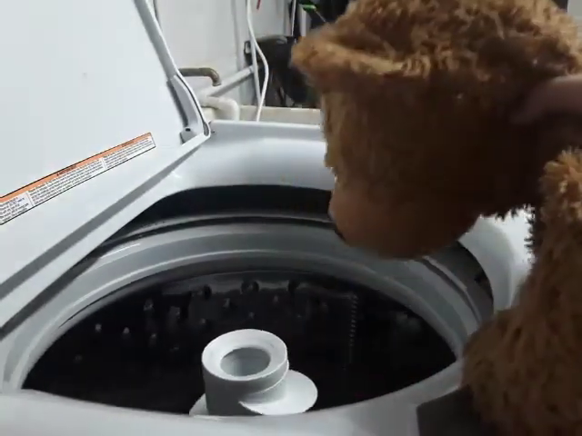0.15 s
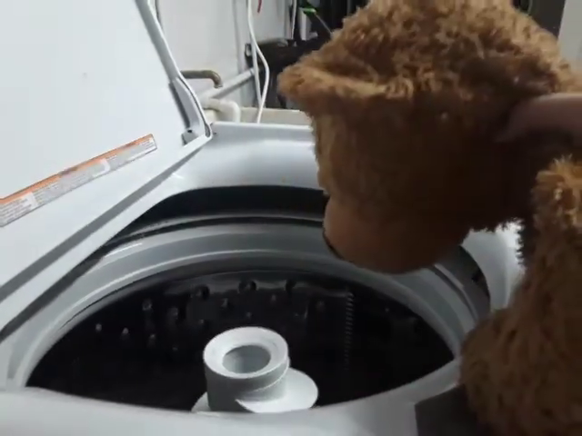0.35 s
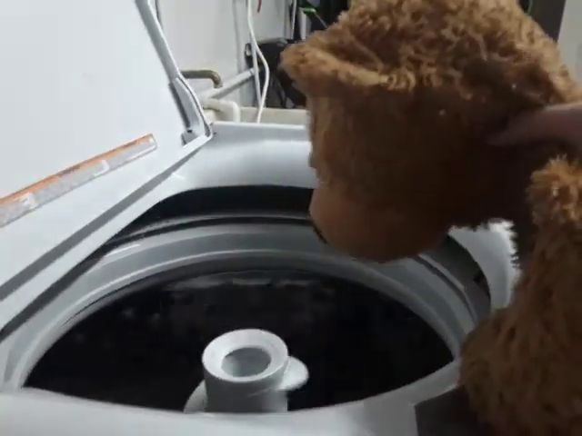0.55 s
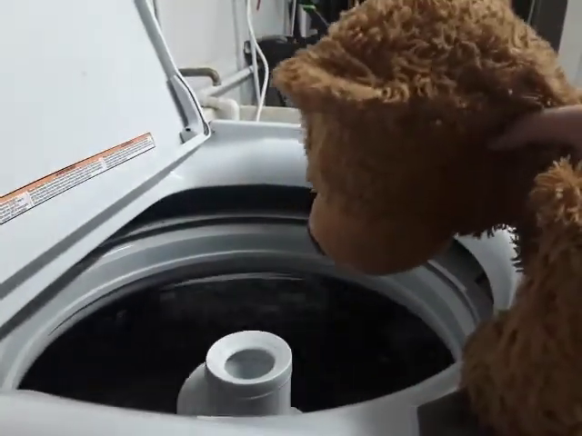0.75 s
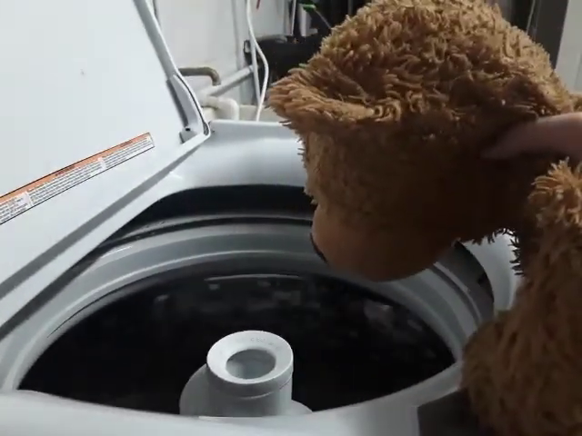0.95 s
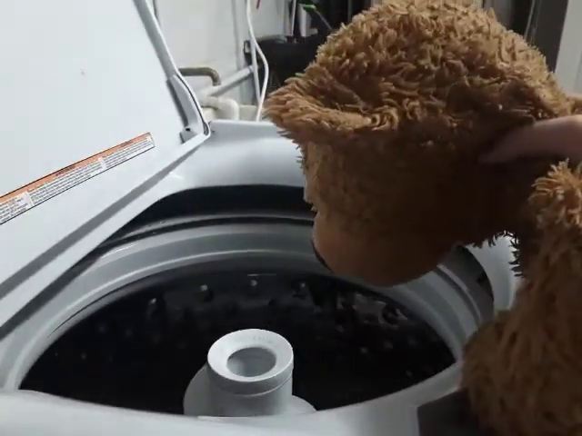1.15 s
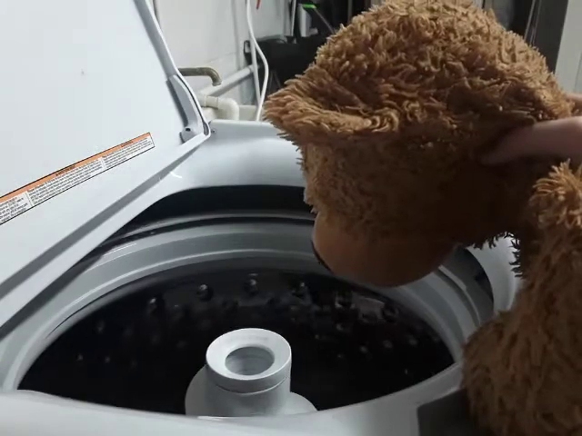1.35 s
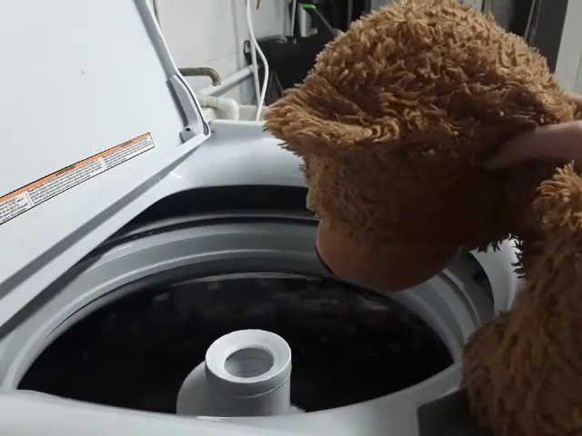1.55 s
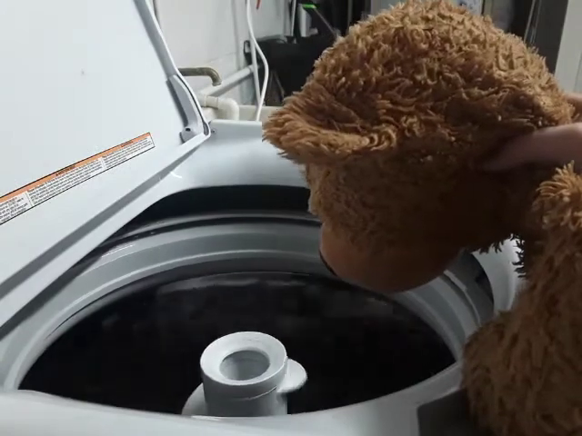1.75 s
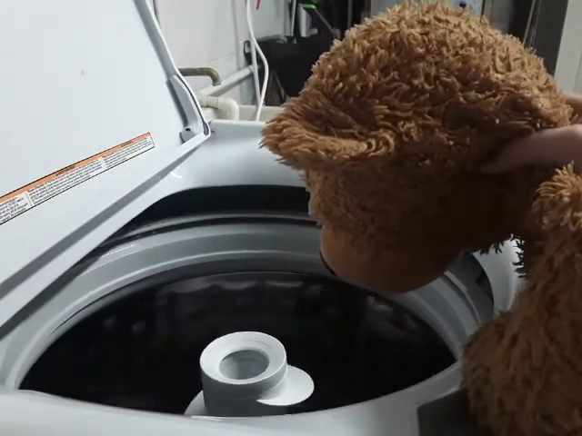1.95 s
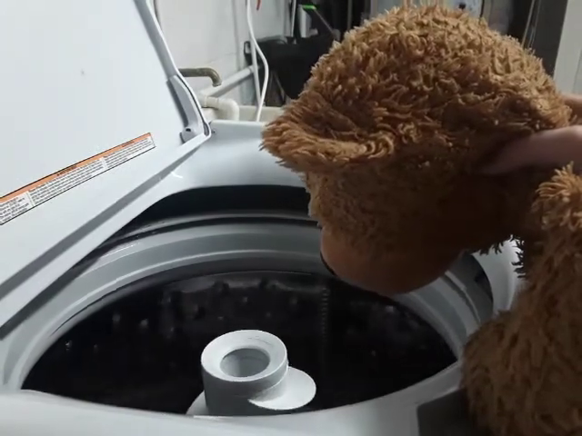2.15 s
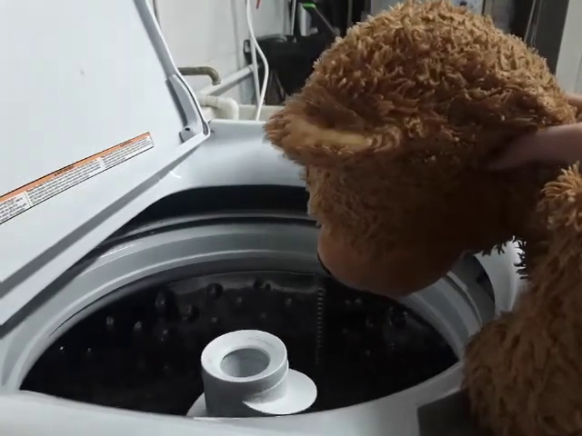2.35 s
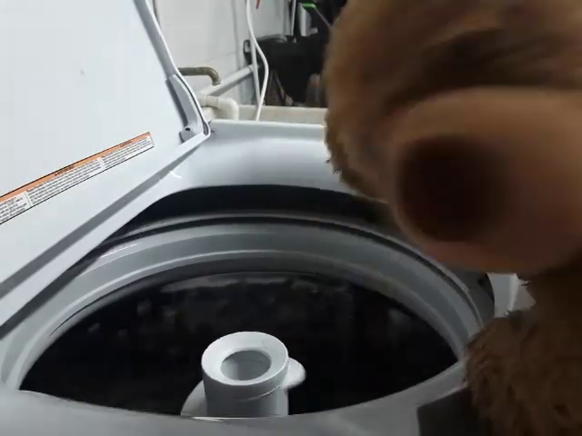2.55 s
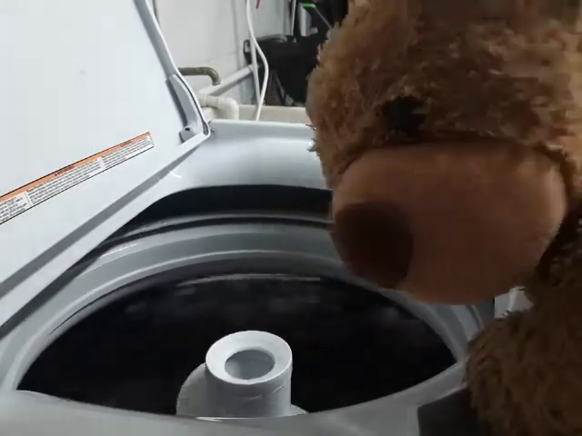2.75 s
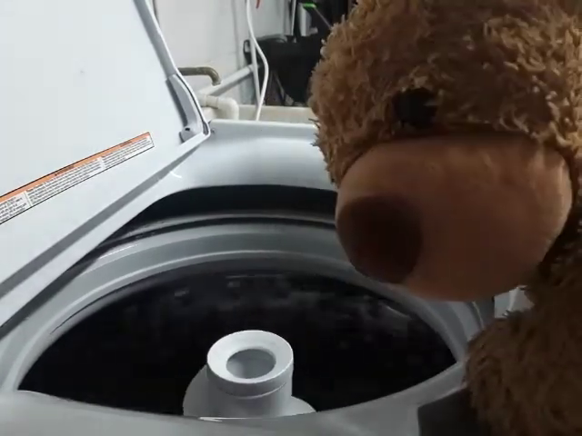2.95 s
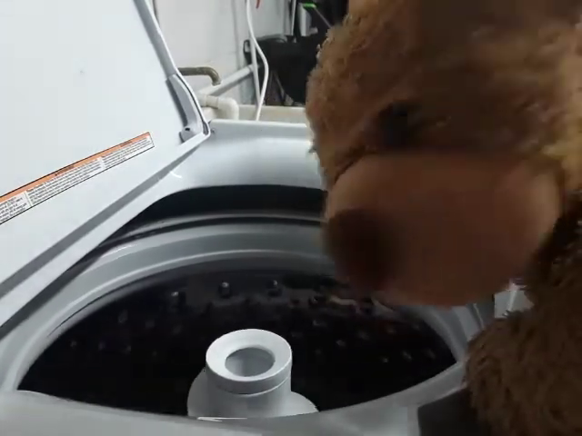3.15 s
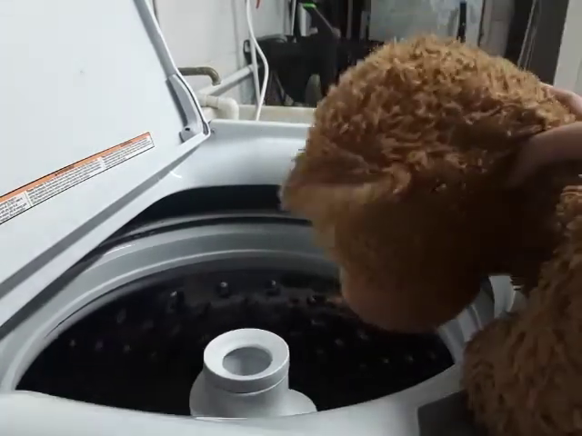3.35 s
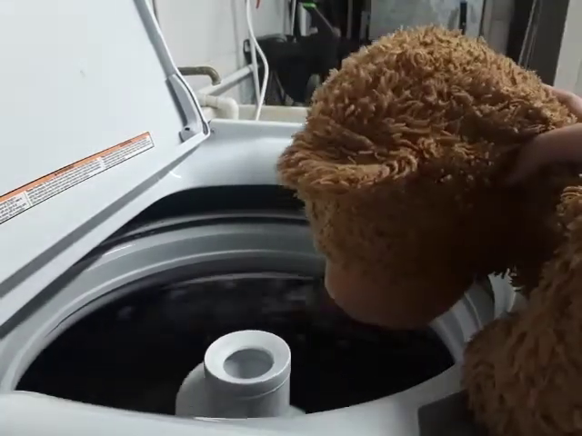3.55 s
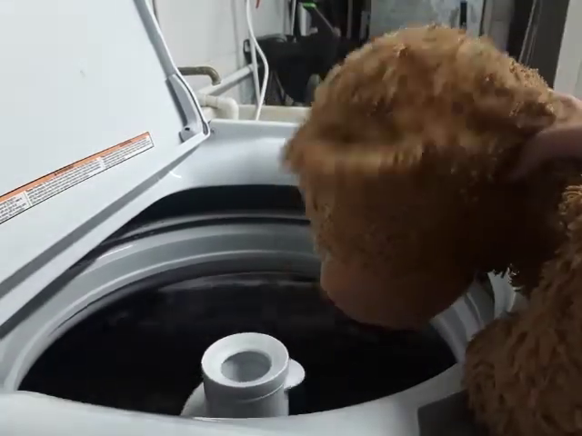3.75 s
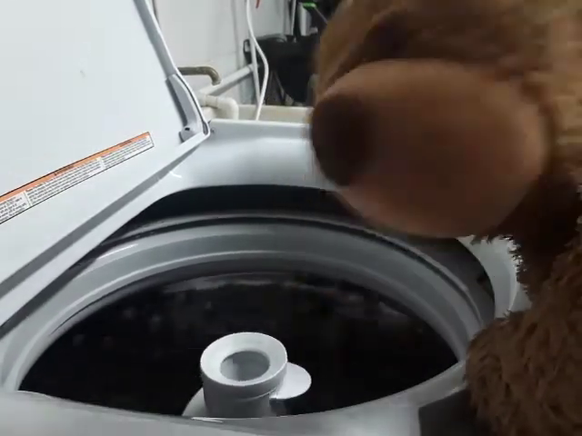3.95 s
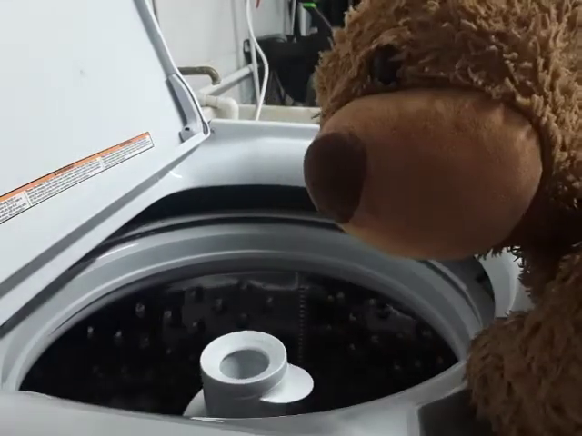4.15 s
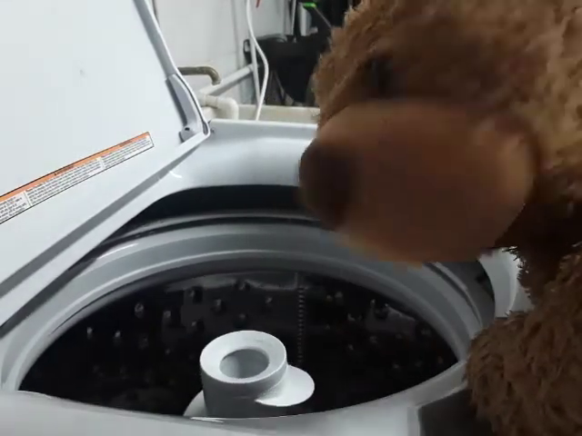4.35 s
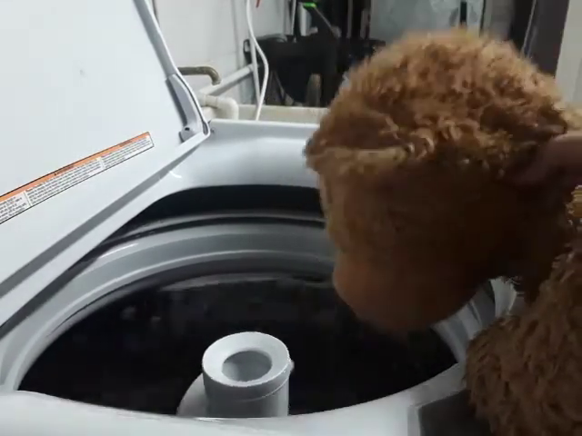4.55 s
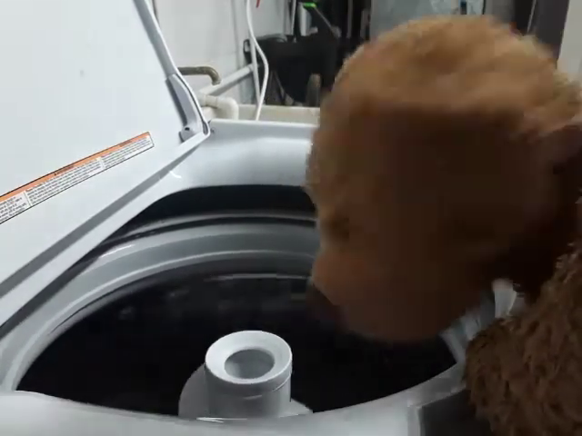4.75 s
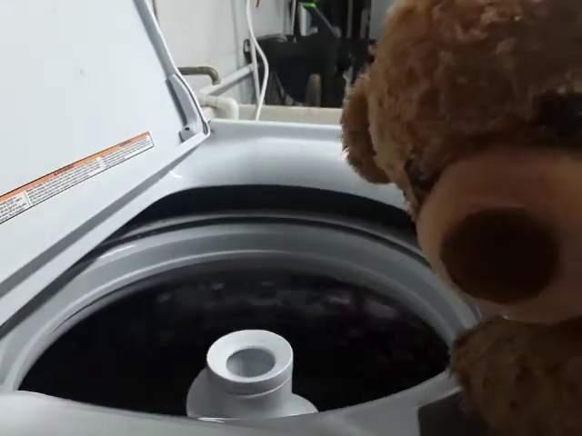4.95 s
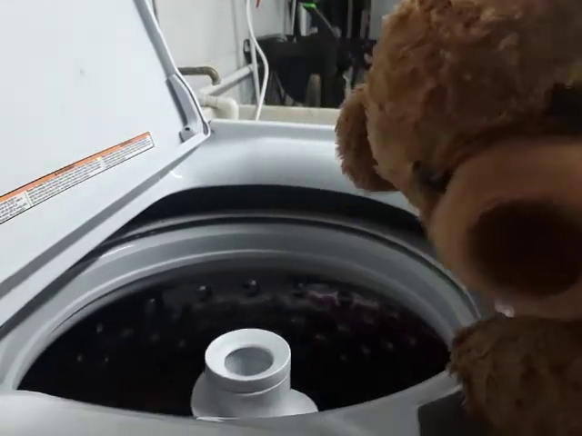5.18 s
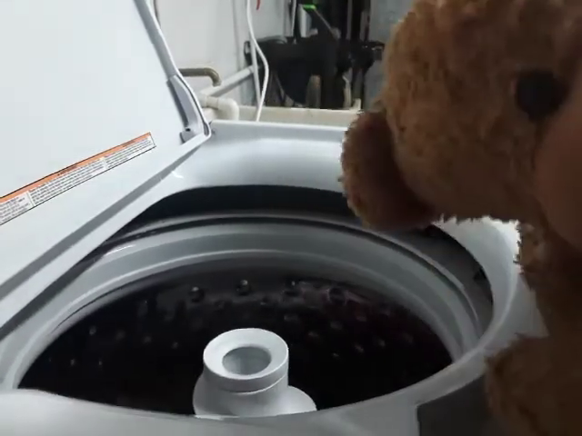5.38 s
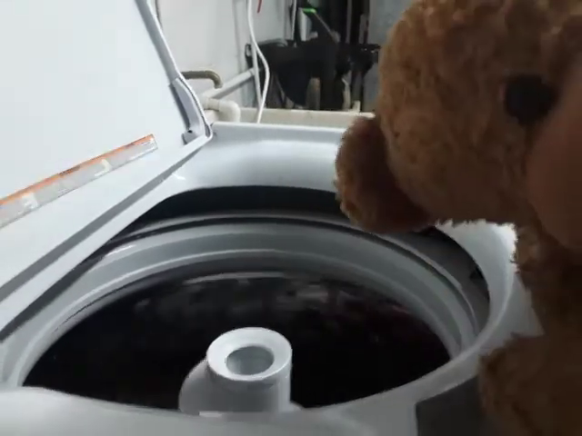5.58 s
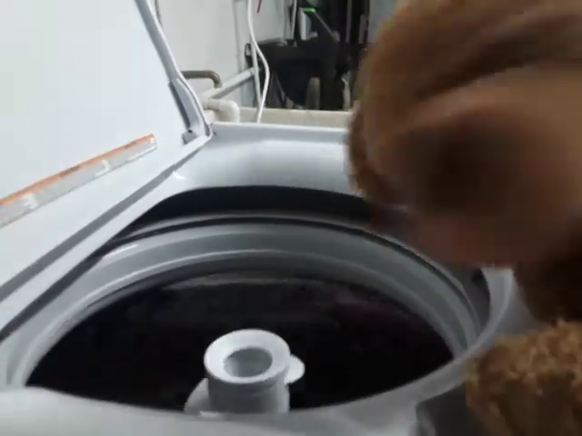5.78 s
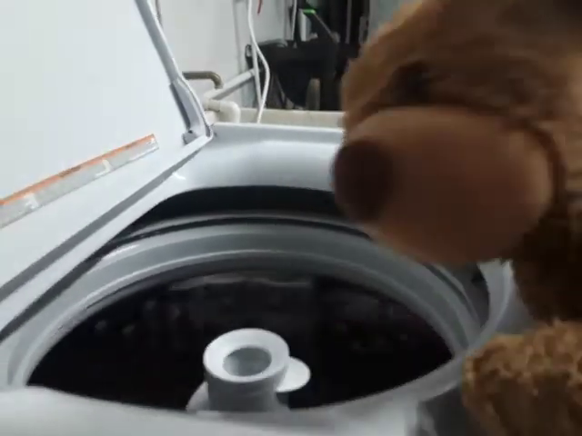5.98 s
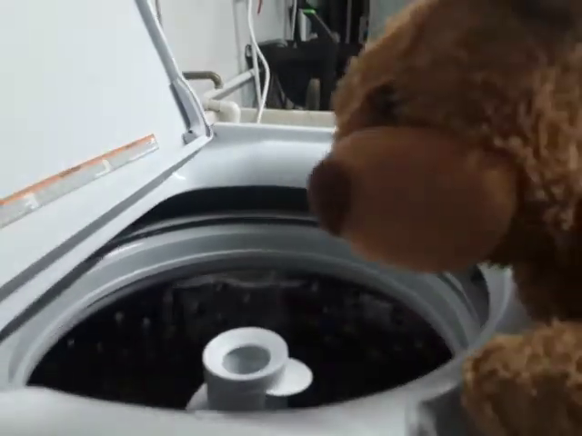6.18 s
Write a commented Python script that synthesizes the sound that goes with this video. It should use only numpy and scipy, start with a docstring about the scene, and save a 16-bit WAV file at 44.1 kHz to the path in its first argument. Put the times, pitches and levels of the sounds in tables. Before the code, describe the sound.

A top-load washing machine agitates, water sloshing and splashing as its motor hums and grinds in short strokes about once a second.

```python
"""Rhythmic sloshing over a buzzing motor: a top-load washer agitates, lid open, in a small laundry room.
Once a second the motor switches on, runs its gears up to speed and brakes, then turns the other way.
Each stroke raises a wave that builds, slaps the basket, swings back and runs off in drips.
The water is swarms of ringing bubbles over noise; gear grinding and churning ring the tub's modes."""
import sys
import numpy as np
from scipy import signal
from scipy.fft import rfft, irfft, next_fast_len
from scipy.io import wavfile
from scipy.ndimage import map_coordinates

SR = 44100
rng = np.random.default_rng(int(sys.argv[2]) if len(sys.argv) > 2 else 0)


def generate_wav(signal):
    """Clip the signal to [-1, 1] and save it as 16-bit WAV at the path in sys.argv[1]."""
    frames = np.transpose(np.atleast_2d(signal))
    scaled = np.clip(frames, -1, 1) * 32767
    pcm = np.round(scaled).astype(np.int16)
    wavfile.write(sys.argv[1], SR, pcm)


N = 274302
TIME = np.arange(N) / SR
BUZZ_HZ = 119.7  # twice mains
# agitator strokes, out and back by turns: on/s, off/s, effort/dB, throb/dB, gear speed factor,
# growl/dB, whine/dB, churn/dB, splash/dB, spray/dB
STROKES = [(-.59, -0.241, 5, -5, 1, 4, 0, 1.5, 0.5, -1), (.413, 0.741, -2.5, -5, 0.98, 1, -1.5, 0, .5, -.5),
           (1.417, 1.74, -.5, 1.5, .99, 0.5, 2, -5.5, 1, 1),
           (2.416, 2.74, -3, -2.5, 0.99, 2.5, -2, 1, 1, 0),
           (3.421, 3.745, -1.5, 5, .997, 0, .5, -2.5, .5, 0),
           (4.422, 4.725, -4, 2, 1.01, 3.5, -2.5, .5, 0, -.5),
           (5.429, 5.758, -1, 1.5, 1, -0.5, 0, -0.5, -1.5, 0.5)]


def amp(db):
    """Decibels to gain."""
    return 10 ** (np.asarray(db) / 20)


def unit(x):
    """Scale to rms 1."""
    return x / np.sqrt(np.mean(x ** 2) + 1e-20)


def curve_at(points, hz):
    """Interpolate on a log-frequency axis."""
    f, value = np.transpose(points)
    return np.interp(np.log(hz + 1), np.log(f + 1), value)


def colour(x, spectrum, db_scale=1):
    """Filter by a spectrum: f/Hz, gain/dB."""
    size = next_fast_len(x.shape[-1] + 2048)
    gain = amp(db_scale * curve_at(spectrum, np.fft.rfftfreq(size, 1 / SR)))
    return irfft(rfft(x, size) * gain, size)[..., :x.shape[-1]]


def spread(pair):
    """Blend two unrelated signals: shared bass, wide treble."""
    coherence = [(60, 1), (150, 0.95), (380, 0.92), (700, 0.17), (1250, 0.23), (2400, 0.042), (4400, 0.046),
                 (15000, 0.032)]  # f/Hz, left-right correlation
    size = next_fast_len(N)
    mid, side = rfft(pair, size)
    same = np.clip(curve_at(coherence, np.fft.rfftfreq(size, 1 / SR)), -1, 1)
    mid, side = mid * np.sqrt(1 + same), side * np.sqrt(1 - same)
    return irfft(np.array([mid + side, mid - side]), size)[:, :N]


def wander(t, per_s):
    """Smooth random curve, rms about 1."""
    return map_coordinates(rng.standard_normal(2048), [t * per_s], order=2, mode="wrap")


def add(mix, start_s, sound):
    """Mix in at start_s, cropped to the mix."""
    start = round(start_s * SR)
    sound = sound[..., max(-start, 0):]
    part = mix[..., max(start, 0):][..., :sound.shape[-1]]
    part += sound[..., :part.shape[-1]]


def room(x, t60_factor=1):
    """Stereo reverberation: dense echoes, each band dying at its own rate."""
    decay = [(100, 1), (250, 1), (600, 0.26), (1500, 0.87), (5000, 0.72), (14000, 0.58)]  # room decay: f/Hz, t60/s
    hz, t, noise = signal.stft(rng.standard_normal((2, SR)), SR, nperseg=256)
    t60_s = t60_factor * curve_at(decay, hz)[:, None]
    tail = signal.istft(noise * amp(-60 * t / t60_s), SR, nperseg=256)[1]
    tail[:, :200] = 0  # pre-delay
    return signal.fftconvolve(np.atleast_2d(x), tail / np.linalg.norm(tail[0]), axes=1)[:, :N]


def tub(x):
    """Ring the modes of tub and cabinet."""
    modes = [(79, 7.1, -13), (125.6, 10, 1), (142.4, 16, -4.5), (171, 16.6, -1.5), (199, 12, -0.5),
             (231, 15.7, 1), (289.5, 10.7, 3), (321.7, 22.4, 4), (373, 19.4, -0.5), (450.4, 22.6, -0.5),
             (483, 37, -5), (510, 8.2, -4), (545.8, 11.3, -1), (578, 6.7, -5.5), (770, 98, -12),
             (894, 12.5, -0.5), (918, 13, -17), (996, 32, -5.5), (1113, 10, -13), (1120, 8, -20)]  # f/Hz, width/Hz, level/dB
    size = next_fast_len(N + SR // 2)
    hz = np.fft.rfftfreq(size, 1 / SR)
    response = sum(amp(db) * 1j * hz * width / (f ** 2 - hz ** 2 + 1j * hz * width)
                   for f, width, db in modes)
    return irfft(rfft(x, size) * response, size)[..., :N]


def room_tone():
    """Steady low rumble with a trace of hiss."""
    spectrum = [(20, -18), (55, 0.5), (90, 1), (120, 14), (170, -0.5), (300, -8.5), (500, -23),
                (800, -22.5), (1200, -39), (2000, -40.5), (5000, -57), (9000, -22), (13000, -12),
                (16000, -26.5)]  # f/Hz, density/dB
    return amp(-61.5) * unit(colour(spread(rng.standard_normal((2, N))), spectrum))


def mains_hum():
    """Faint tone, wavering in level."""
    return amp(-64 + 1.8 * wander(TIME, 9.9)) * np.sin(2 * np.pi * BUZZ_HZ * TIME)


def squeaks():
    """Something wet rubs in the tub: thin, fuzzy tones that swell and fade."""
    rubs = [(0.303, 0.11, 3170, -70), (0.322, 0.098, 1560, -76), (1.266, .09, 1810, -69),
            (3.15, 0.2, 1780, -65.5), (4.152, .13, 2000, -72), (5.086, 0.28, 1800, -69)]  # t/s, length/s, f/Hz, level/dB
    out = np.zeros((2, N))
    for start_s, length_s, hz, db in rubs:
        t = np.arange(0, length_s, 1 / SR)
        fuzz = np.array([wander(t, 300) + 1j * wander(t, 300) for _ in out])
        tone = unit((fuzz * np.exp(2j * np.pi * hz * t)).real)
        add(out, start_s, amp(db) * np.sin(np.pi * (t / length_s) ** 0.42) * tone)
    return out


def motor_buzz(t, speed, swing, throb, growl_db):
    """Magnetic buzz; its overtones lag as the motor takes up the load."""
    harmonics = [(1, -36.5, 0.18), (2, -49, 0.082), (3, -47.5, 0.012), (4, -40, 0.015), (5, -48.5, 0.027),
                 (6, -52.5, 0.22), (10, -57.5, 0.082)]  # multiple, level/dB, swell/s
    out = np.zeros(len(t))
    for k, db, swell_s in harmonics:
        level = amp(db + 2 * wander(t, 36.8)) * np.sqrt(2) * np.minimum(t / swell_s, 1)
        level *= throb if k > 1 else amp(growl_db)
        lag_turns = 0.067 * (k - 1) * (speed + 0.3 * swing)
        out += level * np.sin(2 * np.pi * (k * BUZZ_HZ * t + rng.random() - lag_turns))
    return out


def gear_tones(tones, t, speed, waver, flutter_db):
    """Tones that follow the shaft, wavering with the play between the teeth."""
    out = np.zeros(len(t))
    for hz, db in tones:
        level = amp(db + flutter_db * wander(t, 40.1)) * np.sqrt(2)
        turns = np.cumsum(hz * speed * (1 + waver * wander(t, 60.3))) / SR
        out += level * np.sin(2 * np.pi * (turns + rng.random()))
    return out


def stroke(on_s, off_s, effort_db, throb_db, pace, growl_db, whine_db):
    """One run-up and braking of motor and gears; returns tones and grinding envelope."""
    low_tones = [(75, -64.5), (175, -43.5), (192, -49), (232, -45), (287, -56), (493, -43.5), (560, -63)]  # gear and belt growl at full speed: f/Hz, level/dB
    high_tones = [(697, -56.5), (793, -58), (872, -51.5), (899, -55), (925, -49), (1118, -53),
                  (1146, -46.5), (1174, -45.5), (1608, -52), (1862, -67.5), (2320, -57), (2425, -53)]  # whine at full speed: f/Hz, level/dB
    run_up_s, braking_s, throb_hz, first_throb_s = 0.115, 0.18, 13.93, 0.1308
    mesh_hz, mesh_db, inrush_db = 464, -39, 1.5
    boom_hz, boom_width_hz, boom_db = 355, 36, 7.7  # tub resonance swept by the mesh tone
    t = np.arange(int(0.7 * SR)) / SR
    coast_s = np.maximum(t - (off_s - on_s), 0)
    run_up = np.minimum(t / run_up_s, 1)
    speed = run_up * np.exp(-coast_s / braking_s)
    swing = np.cos(2 * np.pi * throb_hz * (t - first_throb_s)) * speed  # a steady throb, about fourteen times a second
    throb = amp(throb_db * (swing + 0.28))
    current = np.exp(-coast_s / 0.015) * amp(inrush_db * (1 - run_up))
    buzz = current * motor_buzz(t, speed, swing, throb, growl_db)
    shaft = pace * speed * (1 - 0.0035 * swing)
    boom = amp(boom_db * np.exp(-((mesh_hz * shaft - boom_hz) / boom_width_hz) ** 2))
    backlash = np.minimum(coast_s / 0.0068, 1)  # braking loads the teeth's other flank
    mesh = gear_tones([(mesh_hz, mesh_db)], t, shaft, waver=0.012, flutter_db=2.5)
    mesh *= boom * amp(4.4 * backlash) * speed ** 2.6
    growl = gear_tones(low_tones, t, shaft, waver=0.017, flutter_db=1)
    growl *= np.sqrt(throb) * amp(growl_db) * speed ** 2.9
    # panels sing near their own pitches, only close to full speed
    whine = gear_tones(high_tones, t, speed ** 0.5, waver=0.0057, flutter_db=2.5)
    whine *= throb * amp(whine_db) * speed ** 3.7
    torque = 1 + 0.33 * np.cos(2 * np.pi * BUZZ_HZ * t)
    grind = np.minimum(t / 0.016, 1) * np.exp(-coast_s / 0.072)
    grind *= amp(3.5 * speed + 6.84 * backlash) * torque * np.sqrt(throb)
    return buzz + amp(effort_db) * (mesh + growl + whine), amp(effort_db) * grind


def drive():
    """Motor and gears, heard directly, through the cabinet and from the room."""
    grind_spectrum = [(30, -46.5), (90, -16.5), (150, 0.5), (330, 2), (600, 0.5), (800, -1.5), (1170, -6),
                      (1500, -14.5), (4000, -44), (16000, -48)]  # gear friction: f/Hz, density/dB
    rasp_spectrum = [(300, -27.5), (700, -8.5), (900, 8.5), (970, 5), (1170, 11.5), (1250, -13.5),
                     (1520, -21), (1610, 7), (1700, -21), (2150, -23.5), (2400, -13), (2750, -16),
                     (4500, -20.5), (12000, -16.5)]  # panels under full load: f/Hz, density/dB
    tones, strength = np.zeros(N), np.zeros(N)
    for on_s, *motor, _churn, _splash, _spray in STROKES:
        tone, grind = stroke(on_s, *motor)
        add(tones, on_s, tone)
        add(strength, on_s, grind)
    friction = spread(rng.standard_normal((2, N)))
    grinding = amp(-39.5) * unit(tub(strength * colour(friction, grind_spectrum)))
    rasp = amp(-51.5) * unit(strength ** 2 * colour(friction, rasp_spectrum))  # harder is brighter
    return tones + grinding + rasp + amp(-14) * spread(room(tones + grinding[0]))


def drops():
    """Each falling drop traps a bubble that rings briefly in the tub."""
    impacts = [(.777, 1360, -26), (1.752, 4660, -26.5), (1.895, 2550, -33), (1.897, 4780, -38.5),
               (2.148, 1240, -50), (2.228, 2530, -55.5), (2.808, 3420, -30), (3.798, 1300, -32),
               (5.875, 3300, -39.5), (5.925, 3500, -42), (6.015, 2620, -42.5), (6.067, 1320, -45)]  # t/s, f/Hz, level/dB
    out, t = np.zeros(N), np.arange(SR // 8) / SR
    envelope = np.exp(-t / 0.0023) * np.minimum(t / 0.0006, 1)
    for start_s, hz, db in impacts:
        add(out, start_s, amp(db) * np.sin(2 * np.pi * hz * t * (1 + t)) * envelope)
    return out + amp(3.5) * room(out, t60_factor=0.26)


def slaps():
    """Sheets of water hit the basket and break into crackle."""
    hits = [(.008, -26, 5.5, 0.32), (.143, -42, -24, 0.23), (0.485, -35.5, 1, 0.25),
            (0.6112, -25.5, 39, 0.16), (.6416, -24, 18, 0.15), (0.7253, -26, 5, 0.4),
            (1.0125, -32, -9, 0.41), (1.134, -38, -9, 0.41), (1.5292, -24, -20.5, 0.23),
            (1.7522, -17, -23.5, .26), (1.8018, -16.5, 14, 0.16), (1.894, -30, -7, 0.2),
            (2.486, -25, 2, 0.24), (2.6162, -21, 10.5, 0.57), (2.8015, -23.5, -3, 0.27),
            (2.981, -28.5, -26, 0.21), (3.012, -35.5, -4, 0.45), (3.689, -25, -1.5, 0.25),
            (3.8025, -21.5, -9, 0.26), (4.472, -39.5, -3, 0.51), (4.6496, -24, 34, 0.12),
            (4.692, -22.5, 7, 0.2), (4.8617, -20, 5, .28), (4.944, -32, -10, 0.27), (5.7556, -19, 3, 0.16),
            (5.906, -40, 31, .15)]  # t/s, level/dB, treble/dB, t60/s
    out, t = np.zeros((2, N)), np.arange(SR // 3) / SR
    for start_s, db, treble_db, t60_s in hits:
        crackle = rng.standard_normal((2, len(t))) * amp(wander(t, 920))
        spectrum = [(300, -27), (1200, 4), (3500, 0.5), (7000, treble_db - 5.5), (15000, treble_db - 13)]
        envelope = np.minimum(t / 0.0021, 1) * amp(-60 * t / t60_s)
        add(out, start_s - 0.003, amp(db - 12.5) * unit(colour(crackle, spectrum)) * envelope)
    return out


def bubbles(per_s, size_db, cycles, low_hz, high_hz, pitches):
    """Random bubbles, each rising in pitch as it rings down."""
    out, t = np.zeros((2, N)), np.arange(1500) / SR
    for hz in np.geomspace(low_hz, high_hz, pitches):
        age = t * hz / cycles
        glide = 1 + 0.025 * np.minimum(age, 3)
        ring = np.sin(2 * np.pi * hz * t * glide) * np.exp(-age) * (1 - np.exp(-t * hz))
        when, size, side = rng.random((max(int(per_s * N / SR / pitches), 1), 3)).T
        level = amp(size_db * np.minimum(-np.log(1 - size), 5))
        clicks = np.zeros((2, N))
        clicks[:, (when * N).astype(int)] = level * [np.cos(np.pi * side), np.sin(np.pi * side)]
        out += signal.oaconvolve(clicks, hz * ring[None], axes=1)[:, :N]
    return unit(out)


def swarm(grains, spectrum, wash_db, echo_db):
    """Bubbles echo round the steel basket, over a wash of smaller ones."""
    echoed = unit(grains + amp(echo_db) * room(grains, t60_factor=0.11))
    return colour(spread(echoed + amp(wash_db) * rng.standard_normal((2, N))), spectrum)


def waves(shapes, strengths_db, steepness):
    """Envelope: each stroke's wave builds, holds, collapses, swings back once and runs off."""
    run_off_db_per_s, backwash_delay_s, backwash_width_s = 48, 0.301, 0.061
    power = np.zeros(N)
    for k, ((on_s, off_s, *_), strength_db) in enumerate(zip(STROKES, strengths_db)):
        peak_db, rise_s, hold_s, fall_db_per_s, run_off_db, backwash_db = shapes[k % 2]
        build = np.clip((TIME - on_s) / rise_s, 0, 1) ** steepness
        settling_s = np.maximum(TIME - off_s - hold_s, 0)
        release = amp(np.maximum(-fall_db_per_s * settling_s, run_off_db - run_off_db_per_s * settling_s))
        backwash = np.exp(-((TIME - off_s - backwash_delay_s) / backwash_width_s) ** 2)
        power += (amp(peak_db + strength_db + backwash_db * backwash) * build * release) ** 2
    return np.sqrt(power)


def surge(wave, sound, lump_db, lumps_per_s):
    """Swell and sink with the wave, in uneven lumps."""
    return wave * amp(lump_db * wander(TIME, lumps_per_s)) * unit(sound)


def trickle(swirl):
    """Run-off from the basket wall plinks in the tub, fading with the swirl."""
    plinks = bubbles(per_s=64, size_db=1.5, cycles=31, low_hz=1300, high_hz=2528, pitches=24)
    ringing = plinks + amp(-2) * room(plinks, t60_factor=0.64)
    return amp(-31.5) * surge(swirl ** 0.71, ringing, lump_db=-5, lumps_per_s=14)


def water():
    """Deep churning of the load, surface splashes, fine spray and trickle."""
    # bubble spectra: f/Hz, density/dB
    churn_spectrum = [(30, -23), (85, -20.5), (125, 4.5), (250, -4.5), (340, 6), (470, -4), (600, -1),
                      (920, -3.5), (1400, -18), (4000, -37)]
    splash_spectrum = [(150, -21), (450, 4.5), (750, -4.5), (1000, 0.5), (1400, -3), (1900, -1), (2450, 0),
                       (3100, -6.5), (4500, -11.5), (7000, -27), (16000, -61)]
    spray_spectrum = [(800, -45), (2500, -8), (3800, 0), (5500, -0.5), (7000, -1), (10000, -0.5),
                      (13000, -1.5), (16000, -9)]
    # wave shapes, a row per direction: peak/dB, rise/s, hold/s, fall/(dB/s), run-off/dB, backwash/dB
    churn_wave = [(-39.5, .40, 0.1, 93, -12.5, 3), (-40, 0.49, 0.14, 63.5, -12.5, 3)]
    splash_wave = [(-41, 0.19, 0.063, 108, -13.5, -0.074), (-42.5, 0.25, 0.038, 75.5, -9, 1.5)]
    spray_wave = [(-42, 0.38, 0.065, 102, -6, -1), (-45.5, 0.22, 0.029, 58, 0.5, 0.53)]
    *_, churn_db, splash_db, spray_db = np.transpose(STROKES)
    swirl = waves(churn_wave, churn_db, steepness=2.6)
    crest = waves(splash_wave, splash_db, steepness=1.79)
    mist = waves(spray_wave, spray_db, steepness=1.09)
    deep = bubbles(per_s=240, size_db=1.5, cycles=3.75, low_hz=124.9, high_hz=911, pitches=14)
    middle = bubbles(per_s=2000, size_db=2.5, cycles=9.1, low_hz=801, high_hz=6026, pitches=48)
    fine = bubbles(per_s=2400, size_db=5, cycles=9.1, low_hz=2814, high_hz=15270, pitches=28)
    churn = tub(swarm(deep, churn_spectrum, wash_db=12, echo_db=3))
    churn = surge(swirl, churn, lump_db=1, lumps_per_s=35)
    splash = swarm(middle, splash_spectrum, wash_db=1, echo_db=-0.5)
    splash = surge(crest, splash, lump_db=1.35, lumps_per_s=70)
    spray = swarm(fine, spray_spectrum, wash_db=4.5, echo_db=5)
    spray = surge(mist, spray, lump_db=1.03, lumps_per_s=190)
    return amp(-1.5) * churn + amp(3) * splash + amp(1.1) * spray + trickle(swirl)


def scene():
    """Drive and water over room tone and hum."""
    return drive() + water() + slaps() + drops() + squeaks() + room_tone() + mains_hum()


def record(dry):
    """Two small microphones with uneven treble, then a band limit."""
    balance = [(110, -2), (250, 0.5), (400, -3.5), (700, -1.5), (1300, 1), (4000, -0.5), (8000, 2),
               (15000, -1.1)]  # left-right tilt, scaled per channel: f/Hz, gain/dB
    response = [(5500, -0.5), (6800, 5.5), (7300, -2.5), (7700, -12.5), (8600, -10), (10300, -5.5),
                (12000, 3), (13200, 4), (14800, 3), (16000, -1.5)]  # f/Hz, gain/dB
    pair = np.array([colour(dry[0], balance, db_scale=0.97), colour(dry[1], balance, db_scale=-0.73)])
    lowpass = signal.firwin(511, cutoff=15900, window=("kaiser", 9), fs=SR)
    return signal.oaconvolve(colour(pair, response), lowpass[None], "same")


dry = scene()
out = record(dry)
generate_wav(out)
```